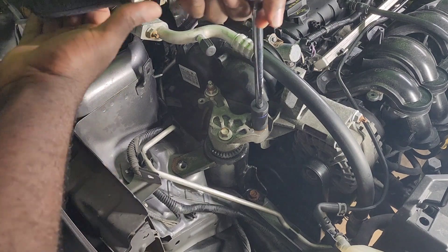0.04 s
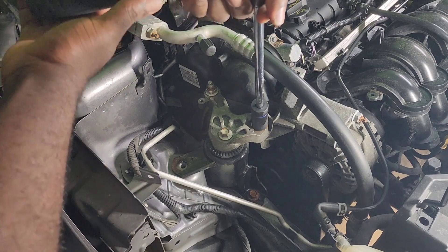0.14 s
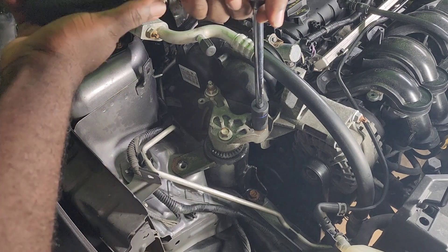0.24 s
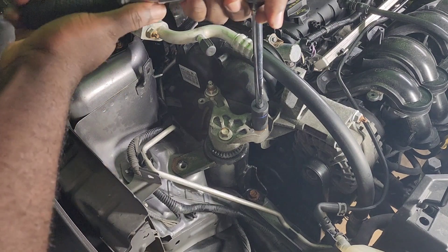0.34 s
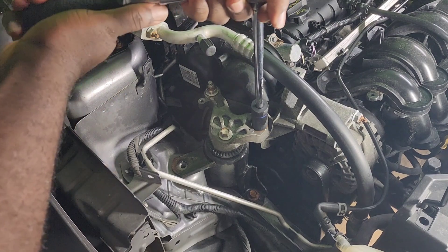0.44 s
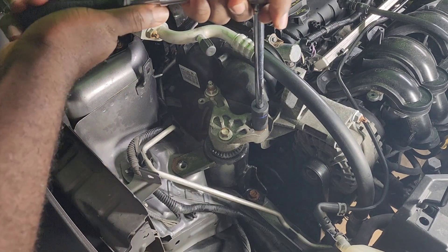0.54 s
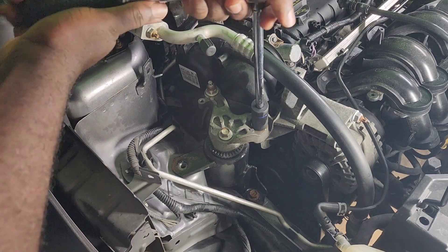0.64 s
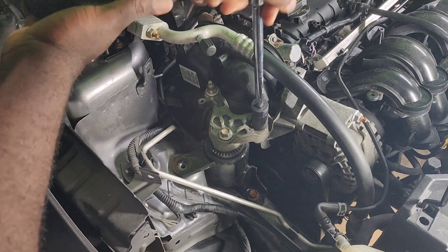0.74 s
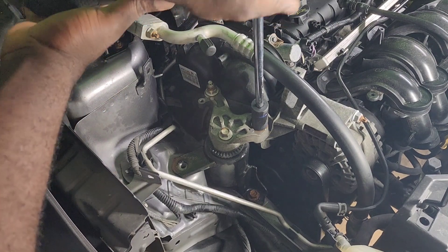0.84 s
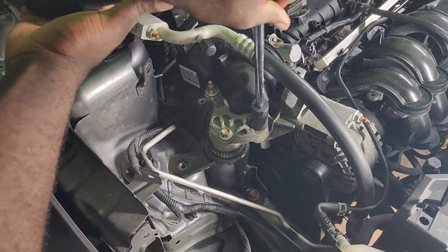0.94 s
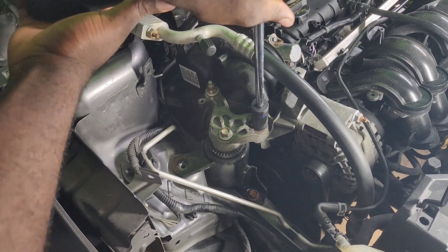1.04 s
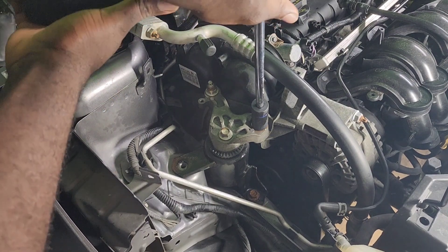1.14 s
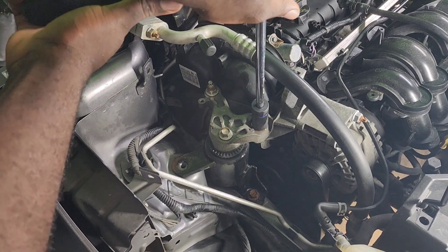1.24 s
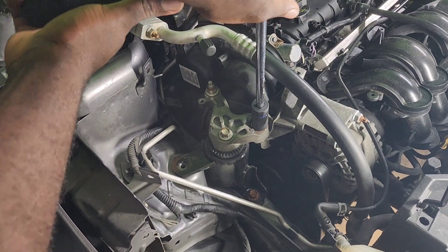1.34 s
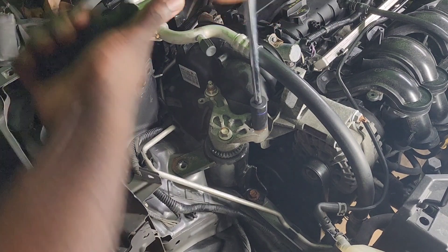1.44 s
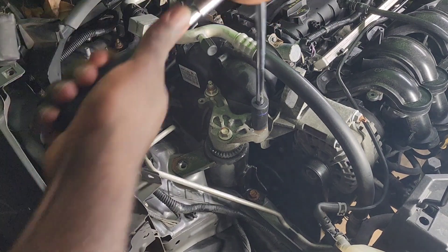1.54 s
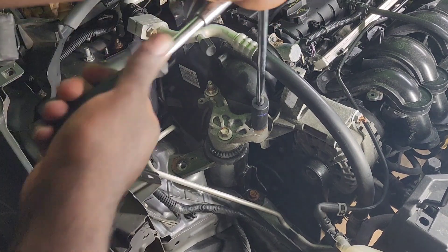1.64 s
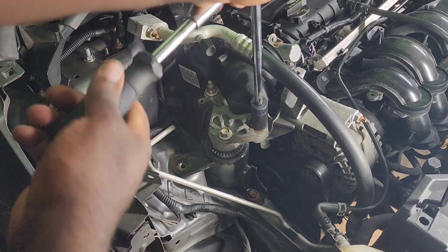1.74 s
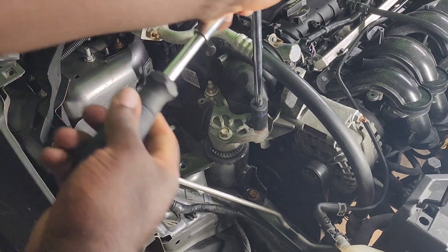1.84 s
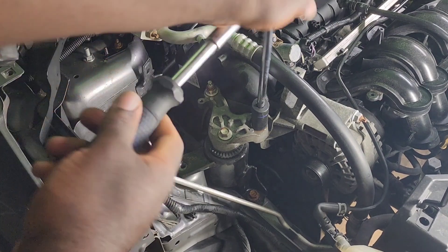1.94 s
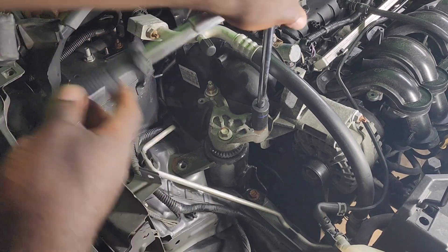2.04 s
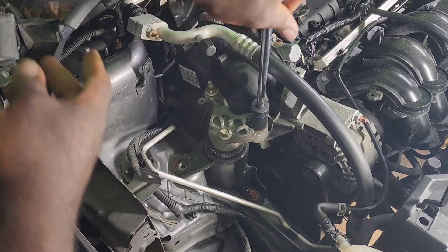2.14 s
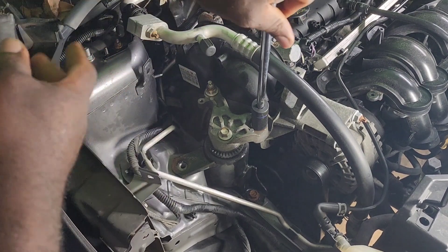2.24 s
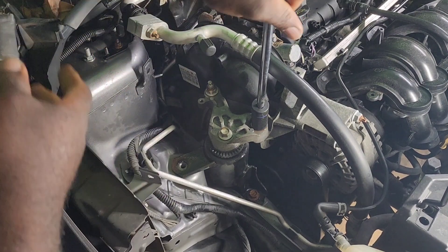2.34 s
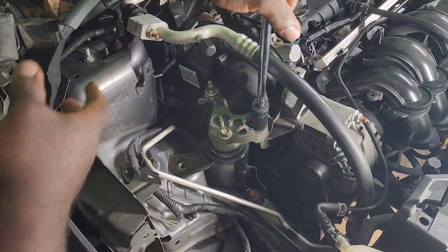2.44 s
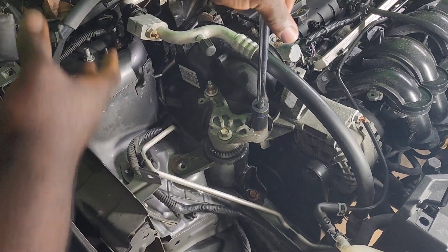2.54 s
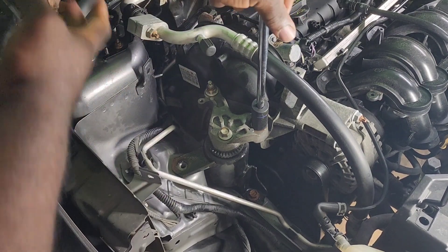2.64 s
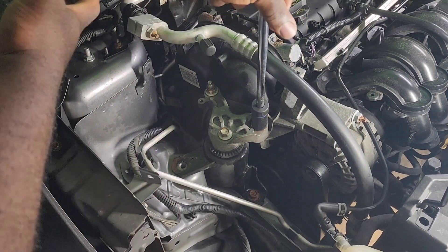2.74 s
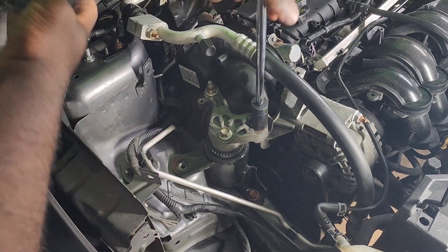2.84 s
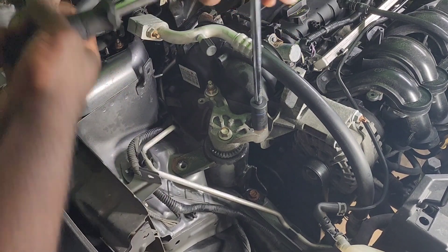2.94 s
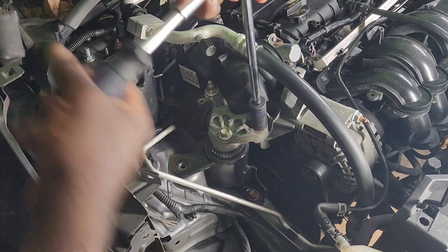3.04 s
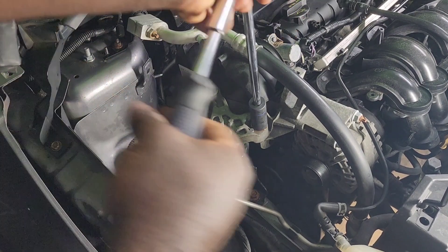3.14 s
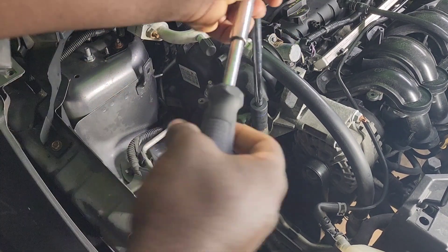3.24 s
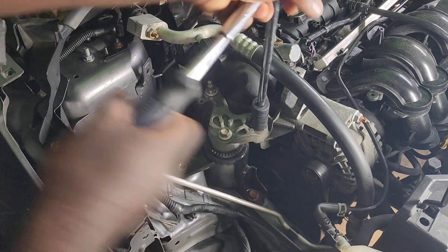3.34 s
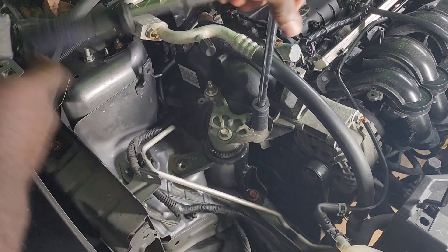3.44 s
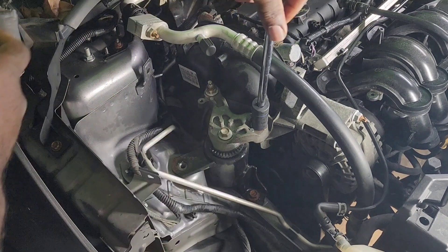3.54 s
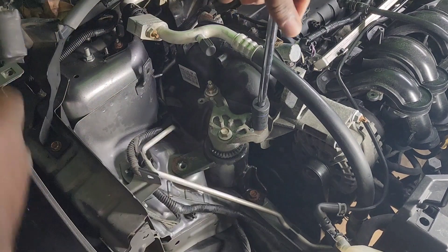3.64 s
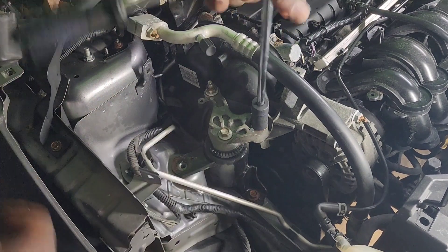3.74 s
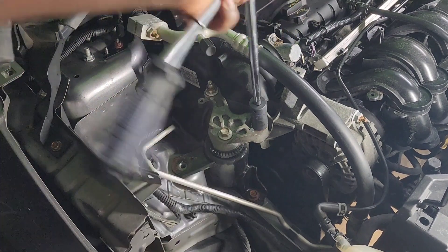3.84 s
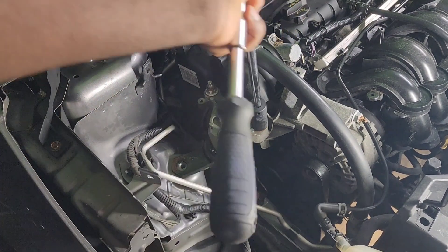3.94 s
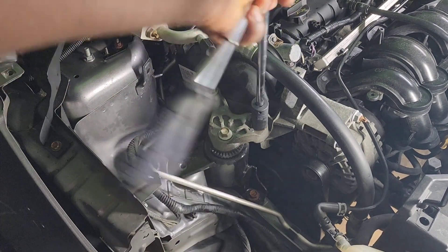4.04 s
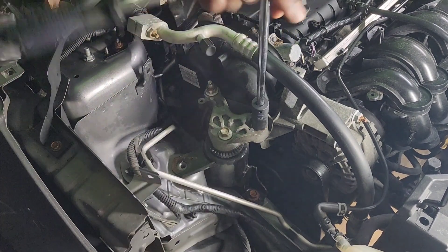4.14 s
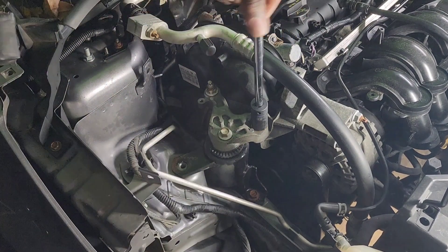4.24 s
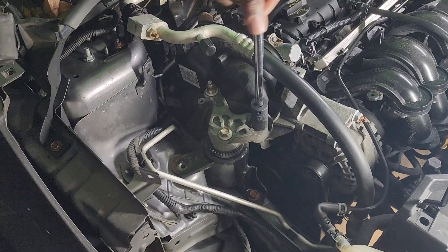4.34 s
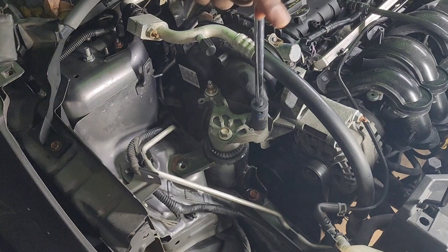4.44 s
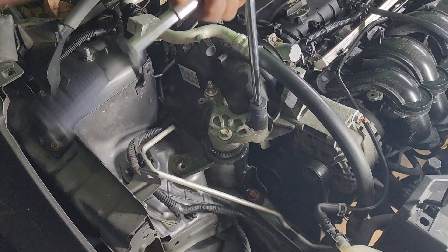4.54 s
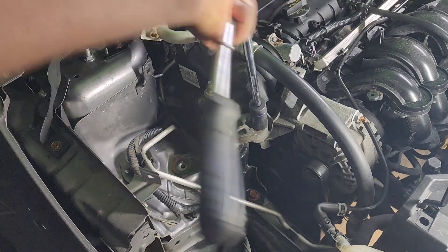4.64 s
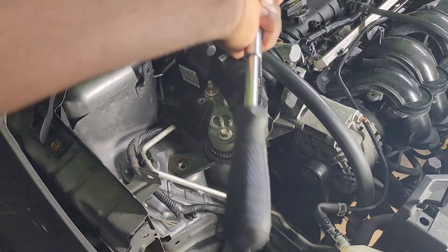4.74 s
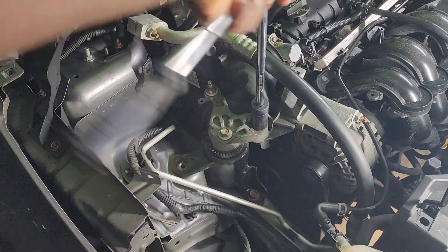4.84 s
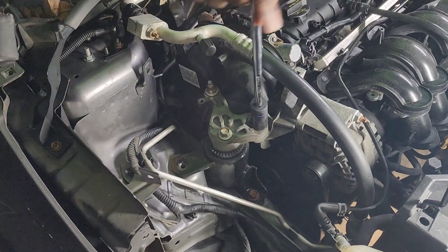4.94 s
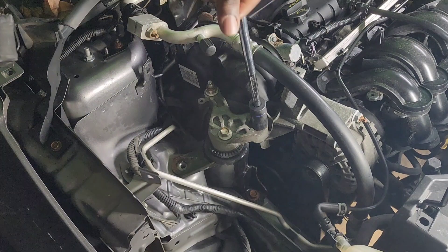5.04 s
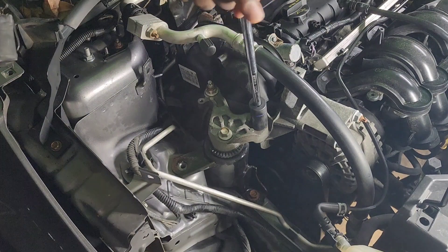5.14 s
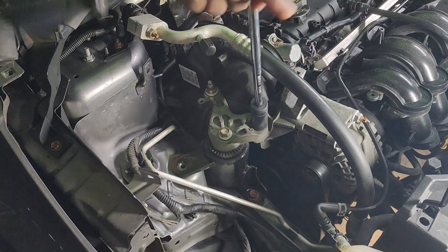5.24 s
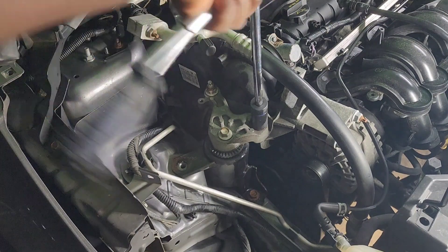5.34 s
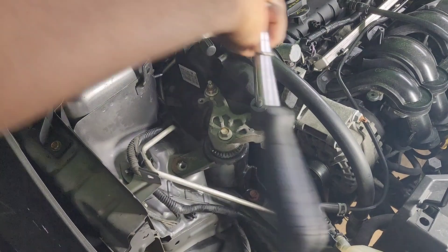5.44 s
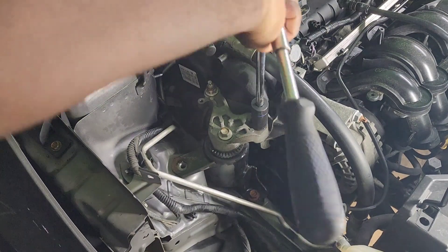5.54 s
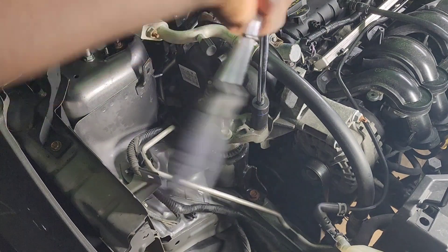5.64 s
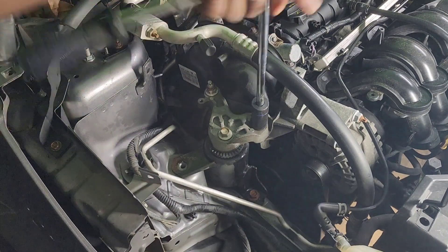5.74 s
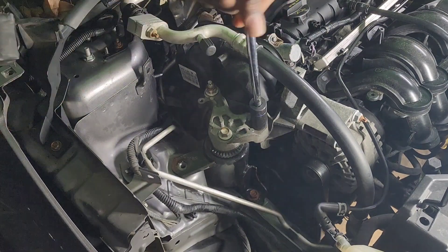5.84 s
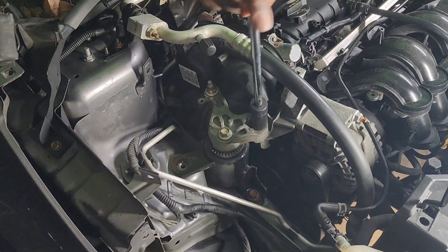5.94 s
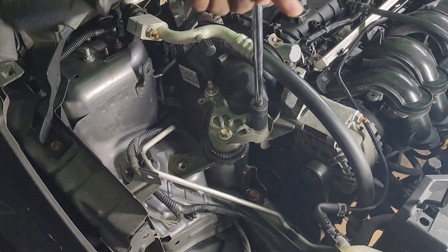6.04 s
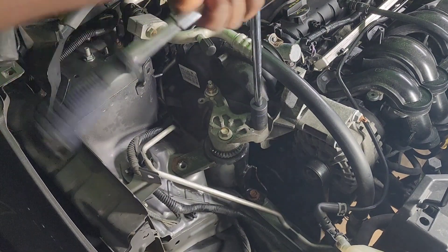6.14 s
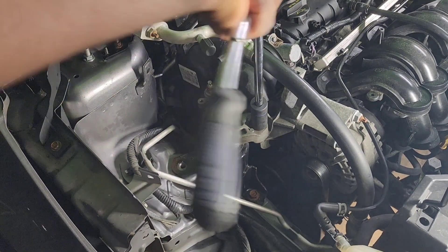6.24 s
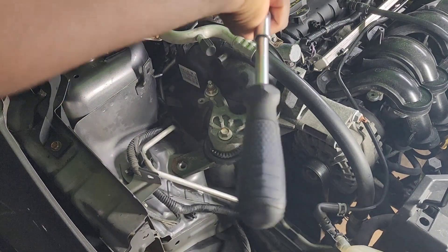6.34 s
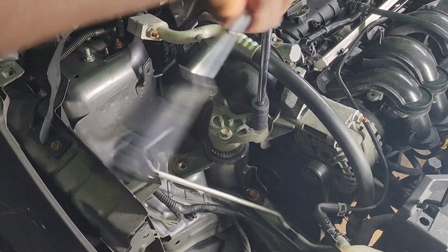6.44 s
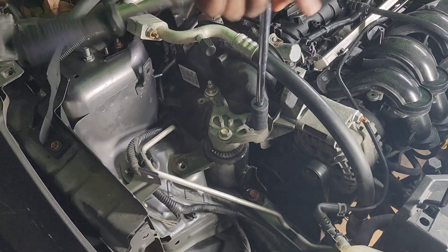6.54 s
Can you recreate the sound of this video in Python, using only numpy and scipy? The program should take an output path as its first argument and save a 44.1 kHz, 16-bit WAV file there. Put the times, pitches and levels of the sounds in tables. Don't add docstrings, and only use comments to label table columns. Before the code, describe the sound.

A ratchet wrench clicks rapidly on its back swings while its socket and extension clank on a bolt close by in a faintly humming garage.

```python
import sys
import numpy as np
from scipy import signal
from scipy.fft import rfft, irfft, next_fast_len
from scipy.io import wavfile
from scipy.ndimage import uniform_filter1d, minimum_filter1d, map_coordinates

SR = 44100
rng = np.random.default_rng(int(sys.argv[2]) if len(sys.argv) > 2 else 0)


def master_out(mix):
    frames = np.transpose(np.atleast_2d(mix))
    ceiling = np.clip(frames, -1, 1)
    pcm = np.round(ceiling * 32767).astype(np.int16)
    wavfile.write(sys.argv[1], SR, pcm)


def nominal_scale(level):
    x = np.asarray(level, float) / 20
    return 10 ** x


N = 290157


def unit(x):
    return x / np.sqrt(np.mean(x ** 2) + 1e-20)


def along(points, hz):
    f, v = np.transpose(points)
    return np.interp(np.log(hz + 1), np.log(f + 1), v)


def curves(rows):
    s, *columns = np.transpose(rows)
    t = np.arange(N) / SR
    return [np.interp(t, s, column, left=-120, right=-120) for column in columns]


def wobble(rate):
    knots = rng.standard_normal(int(N * rate / SR) + 4)
    return map_coordinates(knots, [np.arange(N) * rate / SR])


def filtered(x, response):
    m = next_fast_len(N + SR // 2)
    return irfft(rfft(x, m) * response(np.fft.rfftfreq(m, 1 / SR)), m)[..., :N]


def smoothed_twice(x, size):
    return uniform_filter1d(uniform_filter1d(x, size=size), size=size)


def lumpy(shape, depth_db, width_hz):
    z = rfft(rng.standard_normal(shape))
    size = max(round(width_hz * shape[-1] / SR), 1)
    hills = smoothed_twice(rng.standard_normal((*shape[:-2], 1, z.shape[-1])), size)
    return unit(irfft(z * nominal_scale(depth_db * unit(hills)), shape[-1]))


def resonant(x, modes):
    def response(f):
        total = 0
        for k, (centre, width, db) in enumerate(modes):
            resonance = 1j * f * width / (centre * centre - f * f + 1j * f * width)
            total = total + (-1) ** k * nominal_scale(db / 2) * resonance
        return total ** 2
    power = np.mean(np.abs(response(np.linspace(0, SR / 2, num=2000))) ** 2)
    return filtered(x, response) / np.sqrt(power)


# (frequency [Hz], left-right likeness [0-1])
PORT_LIKENESS = [(60, 1), (290, 0.97), (640, 0.47), (1400, .05), (15000, 0.018)]


def rush(spectrum, patchy_db, size=6):
    z = signal.stft(rng.standard_normal((2, N)), nperseg=512)[2]
    patches = uniform_filter1d(rng.standard_normal(z.shape[1:]), size=size, axis=0)
    patches = uniform_filter1d(patches, size=2 * size, axis=1)
    pair = signal.istft(z * nominal_scale(patchy_db * unit(patches)), nperseg=512)[1][:, :N]

    def response(hz):
        turn = np.arccos(np.clip(along(PORT_LIKENESS, hz), -1, 1)) / 2
        return nominal_scale(along(spectrum, hz)) * [np.cos(turn), np.sin(turn)]
    mid, side = filtered(pair, response)
    return unit(np.array([mid + side, mid - side]))


# (time [s], level [dB])
HUM_LEVEL = [(0, -66), (1.6, -60.5), (2.5, -61.5), (4.2, -55.5), (6.58, -55.5)]
# (frequency [Hz], level [dB])
HUM_PARTIALS = [(59.8, 0.5), (119.6, -12.5)]
# (time [s], hiss level [dB])
HISS_LEVEL = [(0, -50), (.23, -69.5), (.6, -68), (1.1, -66), (1.5, -56.5), (1.58, -61), (2.1, -60),
              (2.55, -65), (2.8, -53.5), (3.33, -61), (4.05, -58.5), (4.45, -50), (4.8, -66.5),
              (5.3, -60), (5.6, -71.5), (6, -55), (6.58, -51)]
# (frequency [Hz], density [dB per Hz])
RUMBLE_SPECTRUM = [(15, -64), (28, -17), (42, -5), (80, -15), (119, -3), (182, -10.5), (266, -2.5),
                   (415, -12), (780, -15.5), (950, -25), (1500, -50), (2500, -91)]
HISS_SPECTRUM = [(470, -16), (900, -16), (2000, -15.5), (4000, -19), (5500, -24), (7200, -21.5),
                 (8500, -26), (9200, -71), (10500, -36), (12500, -38.5), (15800, -41)]


def room():
    t = np.arange(N) / SR
    hum = 0
    for hz, db in HUM_PARTIALS:
        level = nominal_scale(db + 5.0 + 2.45 * wobble(9.5))
        phase = 2 * np.pi * hz * t + 0.23 * wobble(1.5) + [[0], [.25]]
        hum = hum + level * np.sin(phase)
    hum = hum * nominal_scale(curves(HUM_LEVEL)[0]) * nominal_scale([[1.1], [-1.1]])
    hiss_db, = curves(HISS_LEVEL)
    resting_db, hiss_share, creep_db_per_s = -53, 0.15, 0.34
    rumble_db = resting_db + hiss_share * (hiss_db - hiss_db.mean()) + creep_db_per_s * t
    rumble = nominal_scale(rumble_db + 0.44 * wobble(5.3)) * rush(RUMBLE_SPECTRUM, patchy_db=2.0)
    hiss = nominal_scale(hiss_db + .6 * wobble(4)) * rush(HISS_SPECTRUM, patchy_db=2.2, size=18)
    return hum + rumble * nominal_scale([[1.3], [-1.3]]) + hiss


# (time [s], rustle level [dB], bump level [dB])
SLEEVE_STROKES = [
    [(.45, -66.5, -79), (.58, -58.5, -45), (.66, -64, -48.5), (.74, -75, -48.5), (.82, -68, -54.5),
     (.9, -61, -55), (1, -80, -55)],
    [(1.46, -97, -69), (1.54, -55, -51), (1.56, -54, -54), (1.62, -37, -45), (1.66, -54.5, -58),
     (1.74, -64.5, -52), (1.88, -44.5, -56.5), (2.08, -81, -61)],
    [(2.995, -90, -64), (3.01, -80, -40.5), (3.09, -90, -58)],
]
# (frequency [Hz], density [dB per Hz])
CLOTH_SPECTRUM = [(290, -7), (500, -8), (1350, -18.5), (2800, -18.5), (4500, -12.5), (6000, -16),
                  (8300, -16), (10000, -34.5), (13000, -23.5), (15800, -23)]
THUMP_SPECTRUM = [(25, -8.5), (60, 3), (120, 2.5), (300, -2.5), (700, -29.5), (1500, -76)]


def sleeve():
    out = 0
    for stroke in SLEEVE_STROKES:
        rustle_db, bump_db = curves(stroke)
        rustle = unit(nominal_scale(4 * wobble(250)) * rush(CLOTH_SPECTRUM, patchy_db=1.5))
        bump = unit(nominal_scale(0.81 * wobble(24.4)) * rush(THUMP_SPECTRUM, patchy_db=-1.5))
        out = out + nominal_scale(rustle_db) * rustle + nominal_scale(bump_db) * bump * nominal_scale([[2.5], [-2.5]])
    return out


# (delay [ms], level [dB])
WALL_SLAPS = [(6, -26), (14, -16), (22, -20.5)]


def garage(drive, t60, wet_db):
    slaps = np.zeros((2, SR // 20))
    for ms, db in WALL_SLAPS:
        smear = rng.standard_normal((2, 60)) * np.exp(-np.arange(60) / 20)
        smear /= np.linalg.norm(smear, axis=1, keepdims=True)
        slaps[:, round(ms * SR / 1000):][:, :60] += nominal_scale(db) * smear
    t = np.arange(SR // 2 + SR // 4) / SR
    fade = nominal_scale(-120 * t / t60) + 7.4 * nominal_scale(-120 * t / 0.12)
    fade *= 1 - np.exp(-t / 0.00046)
    energy = signal.fftconvolve(np.mean(drive ** 2, axis=0), fade / fade.sum())[:N]
    field = lumpy((3, next_fast_len(N)), depth_db=2.3, width_hz=60)[:, :N]
    field = unit(field[:2] + 0.49 * field[2])
    diffuse = nominal_scale(wet_db + 1.4 * wobble(60)) * np.sqrt(np.abs(energy)) * field
    return signal.fftconvolve(drive, slaps, axes=1)[:, :N] + diffuse


def contacts(rows, groups, rise_ms, snap, alike, spiky_db, buildup=0):
    t = np.arange(SR // 16) / SR
    drive = np.zeros((5, 2, N + len(t)))
    for s, levels_db, pan_db, chatter_ms in rows:
        pan_db = np.clip(pan_db, -7, 10)
        u = t / (np.clip(chatter_ms, .5, 20) / 1000)
        rise_s = (rise_ms + buildup * chatter_ms) / 1000
        envelope = (1 - np.exp(-(t / rise_s) ** 2)) * (np.exp(-1.6 * u) + snap * np.exp(-5.5 * u))
        noise = lumpy((len(levels_db), 3, len(t)), depth_db=3, width_hz=450)
        spikes = nominal_scale(spiky_db * rng.standard_normal(len(t)))
        chatter = alike * noise[:, :1] + np.sqrt(1 - alike ** 2) * noise[:, 1:3]
        chatter = chatter * spikes * envelope
        chatter *= np.sqrt(chatter_ms * SR / 2500) / np.linalg.norm(chatter, axis=2, keepdims=True)
        level = nominal_scale(np.array(levels_db) + 1.0)[:, None, None]
        start = round(s * SR)
        drive[groups, :, start:start + len(t)] += level * chatter * nominal_scale([[pan_db / 2], [-pan_db / 2]])
    return drive[..., :N]


# (time [s], casing level [dB], bay above casing [dB])
ENGINE_KNOCKS = [(1.555, -40.5, -3), (1.585, -52, 13), (1.62, -63, 6), (2.041, -45.5, -11),
                 (2.132, -40.5, -19), (2.158, -32.5, -27), (2.753, -46.5, 9), (3.002, -26, 0),
                 (3.367, -45.5, -9), (3.595, -64, -16), (3.723, -35, 3.5), (4.109, -36.5, -21),
                 (4.449, -38, 4), (4.64, -41.5, 6.5), (4.877, -41.5, -22), (4.933, -36, -38),
                 (5.216, -34.5, 0), (5.69, -45, 7.5), (6.074, -32.5, -10), (6.101, -29, -0.5),
                 (6.116, -45, 13), (6.27, -47.5, 14)]


def knocks():
    rows = [(s, [db - 5.0, db + low - 7.5], .3, 5.9) for s, db, low in ENGINE_KNOCKS]
    return contacts(rows, slice(3, 5), rise_ms=0.24, snap=0.52, alike=1.0, spiky_db=4.5)


# (time [s], force [dB], hardness [dB], left-right [dB], extra clank [dB])
FITTING_CLANKS = [(0.105, -35, -8, 4, 3.5), (0.1892, -62, -5, 3, 14), (0.745, -60, 3, 10, -7),
                  (0.838, -59, -1, 9.5, -2), (0.8467, -50.5, 3, 18, 0), (1.477, -67, 1, 3, 0),
                  (1.518, -61, -6, 4, 8), (1.5706, -41.5, -7, 13, -3), (1.591, -40.5, -5, 10, 5),
                  (1.64, -44, 18, 9.5, 2), (1.6432, -31.5, -6, 4, 2), (1.868, -42.5, 4, 8, 4),
                  (1.9297, -36.5, 15, 6.5, -6.5), (1.9727, -43, 7.5, 7, 6.5), (2.004, -35, -10, 5, 1),
                  (2.0665, -42.5, 6, 11, -5), (2.099, -35.5, 19, -0.5, 1.5), (2.299, -34.5, 25.5, 0, 1),
                  (2.7525, -31.5, -4, 8, 1), (2.7558, -29, 6, 11, 1.5), (2.762, -44, -1, 3, 0),
                  (2.801, -56, 13, 9, 1), (2.8555, -55, 14, 3, 1), (2.8763, -23, 9.5, 0, -0.5),
                  (3.197, -44, 11.5, 7, 3)]
TURNING_CLANKS = [(3.7218, -24.5, 8.5, 4, 1.5), (3.7258, -27, -5, 8.5, 0.5), (3.7589, -31, -4, 3, 1),
                  (3.772, -35, 0, 5, -1), (3.7849, -20, 11, 1, 1.5), (3.791, -21, 1, 14, 0.79),
                  (3.8458, -33, 1, 9, -1), (3.9077, -27, 4.5, 8, 1), (3.9611, -25, 1.5, 2, 0.74),
                  (4.0756, -31.5, -7, 3, 0.5), (4.4938, -23, 0, 4, 0.32), (4.5776, -28.5, 6, 11, 0.92),
                  (4.631, -36, 2, 2, 1), (4.6397, -21, 3, 7, -0.25), (4.6923, -22.5, 6.5, 2, -0.5),
                  (4.84, -38.5, 1, -2, 0), (4.8663, -47.5, 16, 9, 0)]
SPINNING_CLANKS = [(5.2142, -24, 7, 9, 2.5), (5.2561, -21.5, 12.5, 4, 2), (5.3468, -28, 4, 11, -1.5),
                   (5.4011, -30, 2, 12, 4.5), (5.4633, -28.5, 3.5, 19, 4), (5.549, -46, -8, 3, -1),
                   (5.6066, -38.5, -25, 1, -2), (5.612, -48, -26.5, 0, 8), (5.647, -41.5, -7, 3, 5.5),
                   (5.687, -40.5, -9, 4, 0), (6.0323, -34.5, -2, 5, 6.5), (6.054, -30, 12, 10, -7),
                   (6.0752, -9, 14, 3, -5.5), (6.0945, -21.5, 10, 6, 3.5), (6.099, -22, 4, 0, 6.5),
                   (6.1472, -28.5, 8.5, 12, 8), (6.213, -33, 4.5, 7, 2), (6.2704, -21.5, -3, 7.5, -0.5),
                   (6.3152, -23.5, 4, -1, 2.5), (6.3738, -23.5, -6, 0, -4), (6.4048, -21.5, -1, 0, -1.5),
                   (6.461, -26, 0, -2, -0.5), (6.49, -65, 34, -18, -3)]
# (time [s], force [dB], left-right [dB])
MUFFLED_CLANKS = [(1.553, -38, 4), (2.0396, -41, 2), (4.4447, -36.5, 8), (4.459, -47, -11),
                  (4.486, -33.5, 2), (5.2, -35, -5)]
# (time [s], force [dB], left-right [dB])
SOCKET_SEATING = [
    (2.9999, -19.5, -8.5),
    (3.0014, -13.5, 7),
    (3.014, -33, 0),
    (3.0215, -33, 5),
]


def joints():
    out = []
    for rows, ms in ((FITTING_CLANKS, 1.9), (TURNING_CLANKS, 2.2), (SPINNING_CLANKS, 2.31)):
        for s, db, hard_db, pan, clank in rows:
            clank_db = db - 4.5 - 0.067 * hard_db + clank
            out.append((s, db - 13 + hard_db, db, clank_db, pan, ms))
    out += [(s, db - 30, db - 33, db, pan, 4.2) for s, db, pan in MUFFLED_CLANKS]
    out += [(s, db - 3, db - 2.5, db, pan, 2.25) for s, db, pan in SOCKET_SEATING]
    return sorted(out)


def slack():
    rows = [(s, levels_db, pan, ms) for s, *levels_db, pan, ms in joints()]
    return contacts(rows, slice(0, 3), rise_ms=0.2, snap=0.79, alike=0.42, spiky_db=2)


# (frequency [Hz], level [dB], t60 [s])
STEEL_MODES = [(1174, -5, 0.051), (1944, 1.5, 0.038), (2343, 10, 0.022), (3740, 5, .04), (4090, 6, 0.018),
               (4580, -7, 0.11), (5370, -5.5, 0.028), (6440, -9, 0.041), (7300, -24, 0.028),
               (11700, -15, 0.02), (13200, -16, .03)]


def extension():
    out, t = np.zeros((2, N + SR)), np.arange(SR // 9) / SR
    hz, mode_db, t60 = np.transpose(STEEL_MODES)[..., None]
    for s, _, ring_db, clank_db, *_ in joints():
        scatter, detune, *turns = rng.standard_normal((4, len(STEEL_MODES), 1))
        strength_db = 1.78 * np.where(hz < 5000, clank_db, ring_db) + 3.0
        level = nominal_scale(strength_db + mode_db + 4.1 * scatter - 60 * t / t60)
        phase = 2 * np.pi * hz * (1 + 0.0045 * detune) * t
        ring = np.array([np.sum(level * np.sin(phase + turn), axis=0) for turn in turns])
        out[:, round(s * SR):][:, :len(t)] += ring * (1 - np.exp(-t / 0.00021))
    return out[:, :N]


# (time [s], force [dB], chatter [ms], extra ping [dB], extra clank [dB])
BACK_SWING_1 = [(2.122, -39, 3.9, -7, -2), (2.128, -25.5, 2.7, 1.5, 4), (2.133, -26.5, 2.9, 4.5, 1),
                (2.1483, -24.5, 2.8, 0, 0.5), (2.1557, -24.5, 3.9, -1, -2), (2.167, -23, 2.9, 2, 1),
                (2.171, -31, 6, 4.5, 6.5), (2.181, -25, 0.8, -3, -2), (2.1875, -22.5, 2.5, 1, 0),
                (2.192, -25, 4.4, 1, -0.5), (2.211, -24.5, 1.1, 8.5, 0.5), (2.216, -25.5, 3, 4.5, -2),
                (2.243, -32.5, 2.2, 6, 0)]
BACK_SWING_2 = [(3.4158, -22, 0.82, 8.5, -0.13), (3.4212, -37, 0.81, 2, -1), (3.436, -35, 4.4, 7, 1),
                (3.443, -36, 1.8, 6, -1), (3.457, -37, 10, 4.5, 2.2), (3.481, -39, 8, 7, 1.2),
                (3.487, -39, 18, 0, 1.2), (3.5002, -38, 6.4, 6, -1), (3.5114, -28, 3.5, 2, 1),
                (3.524, -33, 4, 3.5, 1), (3.535, -20.5, 1.8, 0, -2.2), (3.5388, -24, 3, 1, 0.84),
                (3.56, -21, 2.9, 5.5, 0.36), (3.594, -16.5, 2.3, 1, -0.05)]
BACK_SWING_3 = [(4.1224, -22.5, 4.5, -1.6, 4.5), (4.1408, -23, 3.7, 0.64, 1), (4.145, -23, 3.6, 0.85, 0),
                (4.158, -26, 10.5, -1, 4), (4.178, -24, 6.7, -1, 1.5), (4.1981, -22.5, 5.1, 0.53, -1),
                (4.2239, -16, 1.6, 1, 3.5), (4.248, -17, 2.1, 1, 3), (4.2717, -22.5, 2.9, 1, -5),
                (4.2756, -24.5, 1.3, 1, 11), (4.3015, -21, 2, 1, -7), (4.303, -21, 1.4, 1, -1),
                (4.3248, -21.5, 1.7, 1, 1), (4.329, -18, 0.69, 1, 6), (4.354, -31.5, 4.2, 1, 1)]
BACK_SWING_4 = [(4.8959, -21, 4, -4, 1), (4.913, -18.5, 2.8, 1, -1), (4.929, -20.5, 2.2, 0, 0.92),
                (4.9457, -25.5, 2.8, 4, 1), (4.961, -27.5, 3.1, 6, 1), (4.9727, -30, 4, 3.5, 1),
                (4.993, -28, 3, 4, -1), (5.0008, -26, 1.5, 8, -1), (5.0055, -31, 1.5, 4, -1),
                (5.0115, -23.5, 1.6, 4, -1), (5.019, -21, 1.1, 2, -1), (5.03, -18, 1.6, 6, -1.2),
                (5.034, -20.5, 4, 2.5, 0.76), (5.048, -17, 4.3, -0.5, -1.2), (5.07, -18.5, 3.2, 3.5, -1.4),
                (5.0774, -27, 1.6, 1, -1)]
BACK_SWING_5 = [(5.705, -30, 3.7, -3, 3), (5.714, -18.5, 4.1, -0.5, 1), (5.7338, -14, 2.6, -2, -0.5),
                (5.754, -15, 2.4, 1, 2.5), (5.7577, -23, 3.3, -11, -3), (5.7704, -14.5, 4.3, -8, 1),
                (5.777, -25, 3, 6, -3), (5.789, -17, 3.6, -1, 1), (5.8038, -19, 4.7, 2.5, -1),
                (5.8183, -14.5, 1.9, -2.5, 6.3), (5.824, -24.5, 4.9, 4, 1.2), (5.834, -22.5, 5.3, 2, -5),
                (5.839, -16.5, 1.3, 1, 5.5), (5.849, -19.5, 3.9, -3, -3), (5.859, -15, 1.4, -1, -5),
                (5.868, -18, 2.3, 5.5, 1), (5.879, -14, 0.32, 6, 1), (5.8862, -22, 1.2, 5, -3),
                (5.898, -30.5, 2.7, 10, 2), (5.9285, -26.5, 1.1, 6.5, -9), (5.932, -31, 1, 4, -6)]
BACK_SWING_6 = [(6.517, -30.5, 1.6, 1, 1), (6.5198, -30.5, 1.4, 1, 1), (6.5327, -27, 1.7, 1, 1),
                (6.549, -32, 7.2, 0.95, 1), (6.565, -40, 9.3, 0.81, 1)]
# (ping [dB], clank [dB])
HEAD_FACING = [(6, -4), (4, -7.5), (7, -9.5), (2.5, -8), (0.5, -8), (7, -4)]


def teeth():
    swings = (BACK_SWING_1, BACK_SWING_2, BACK_SWING_3, BACK_SWING_4, BACK_SWING_5, BACK_SWING_6)
    falls = []
    for swing, (ping_db, clank_db) in zip(swings, HEAD_FACING):
        for s, db, ms, ping, clank in swing:
            firm_db = 0.34 * (db + 20.5)
            falls.append((s, [db + ping_db + ping + firm_db, db, db + clank_db + clank], 2.5, ms))
    return contacts(falls, slice(0, 3), rise_ms=0.54, snap=0.28, alike=0.22, spiky_db=2.0, buildup=.35)


# (frequency [Hz], width [Hz], level [dB])
PING_MODES = [(9920, 6800, -13.5), (12210, 1590, 10), (13460, 1680, 3), (15850, 990, 1.5)]
RING_MODES = [(4920, 1650, -3), (6580, 555, 7), (7170, 640, 8), (8340, 2580, -5)]
CLANK_MODES = [(1283, 2160, -14.5), (2380, 1020, 0), (3494, 1140, -3), (4550, 620, -4)]
CASING_MODES = [(777, 333, -0.5), (1183, 118, 7), (1574, 1060, -6.5)]
BAY_MODES = [(129, 400, -12), (284, 190, 4.5), (482, 540, -6)]
GARAGE_T60 = [0.48, 0.73, 0.69, 0.77, 0.58]
TAIL_LEVEL = [-8.5, -4, -4.5, 8, 3.5]
LEFT_LEAN = [0.79, -1.17, -0.81, -0.72, 0.35]


def wrench():
    drives = teeth() + slack() + knocks()
    modes = (PING_MODES, RING_MODES, CLANK_MODES, CASING_MODES, BAY_MODES)
    out = 0
    for drive, body, t60, wet_db, lean in zip(drives, modes, GARAGE_T60, TAIL_LEVEL, LEFT_LEAN):
        out = out + resonant(drive + garage(drive, t60, wet_db), body) * nominal_scale([[lean], [-lean]])
    return out


def scene():
    return wrench() + extension() + sleeve() + room()


def soft_limit(x, ceiling=.95):
    return x / (1 + np.abs(x / ceiling) ** 6) ** (1 / 6)


# (frequency [Hz], level under the nearest click [dB])
LOST_BELOW = [(1500, -70), (2500, -46), (8200, -46), (8800, -24), (10600, -24), (11500, -40), (13500, -40),
              (14500, -25), (16500, -30)]


def lost_beside_clicks(x):
    hz, _, z = signal.stft(x, SR, nperseg=256)
    bands = np.mean(np.abs(z[:, :128]).reshape(2, 32, 4, -1) ** 2, axis=(0, 2))
    click = -minimum_filter1d(-bands[3:].max(axis=0), size=13)
    threshold = click * nominal_scale(2 * along(LOST_BELOW, hz[2:128:4]))[:, None]
    margin = uniform_filter1d(bands, size=3, axis=1) / (threshold + 1e-20)
    share = np.where(margin < nominal_scale(2 * -12), .3, .8)
    draw = np.repeat(rng.random(bands.shape), 6, axis=1)[:, :bands.shape[1]]
    lost = (margin < 1) & (draw < share)
    z[:, :128] *= np.repeat(~lost, 4, axis=0)
    return signal.istft(z, SR, nperseg=256)[1][:, :N]


# (frequency [Hz], gain [dB])
PHONE_TOP = [(15300, -0.5), (15900, -28.5), (17000, -30.5), (17200, -120)]


def phone_ports(x):
    def response(hz):
        lead_s = 0.000082 / (1 + (hz / 2500) ** 2)
        return nominal_scale(along(PHONE_TOP, hz)) * np.exp(1j * np.pi * hz * lead_s * np.array([[1], [-1]]))
    return filtered(x, response)


def band_limit(x):
    return signal.sosfilt(signal.butter(12, 16970, fs=SR, output="sos"), x)


def record(dry):
    mix = phone_ports(lost_beside_clicks(soft_limit(dry)))
    return band_limit(mix)


dry = scene()
out = record(dry)
master_out(out)
```